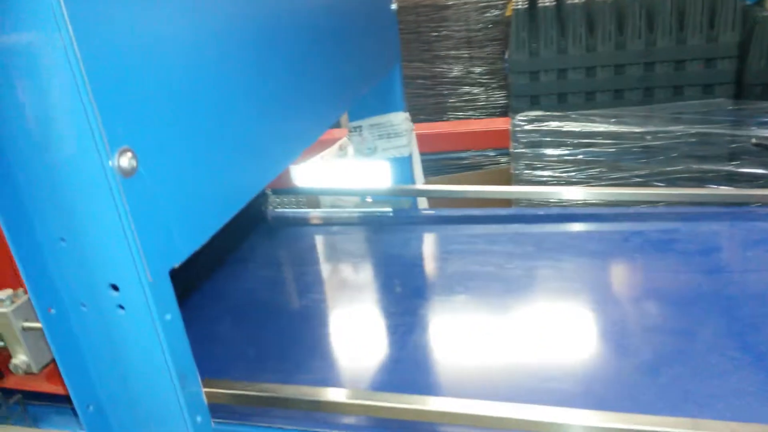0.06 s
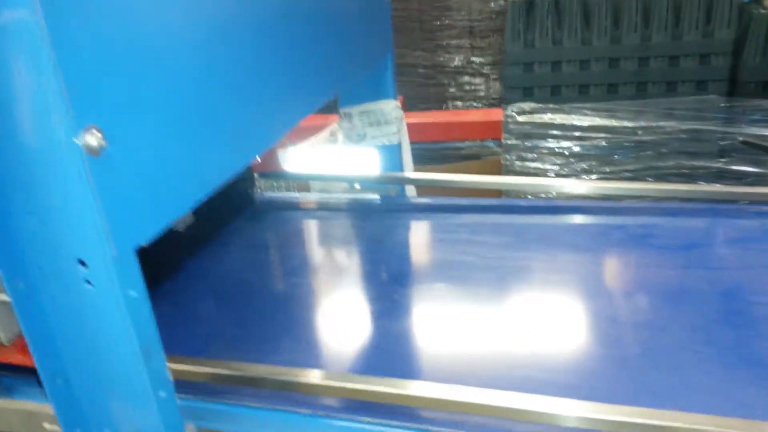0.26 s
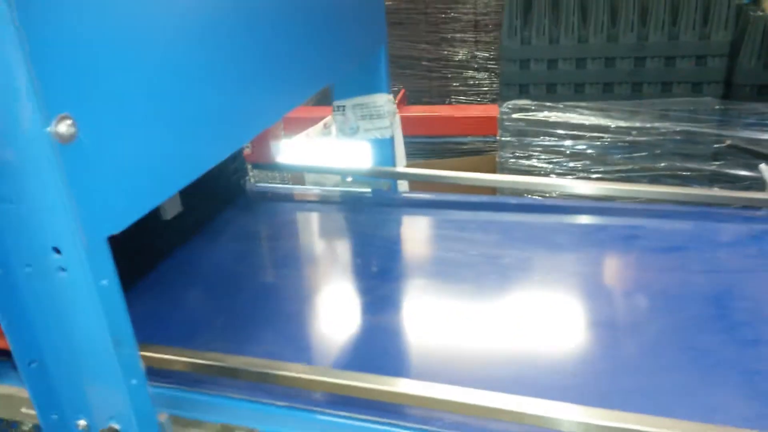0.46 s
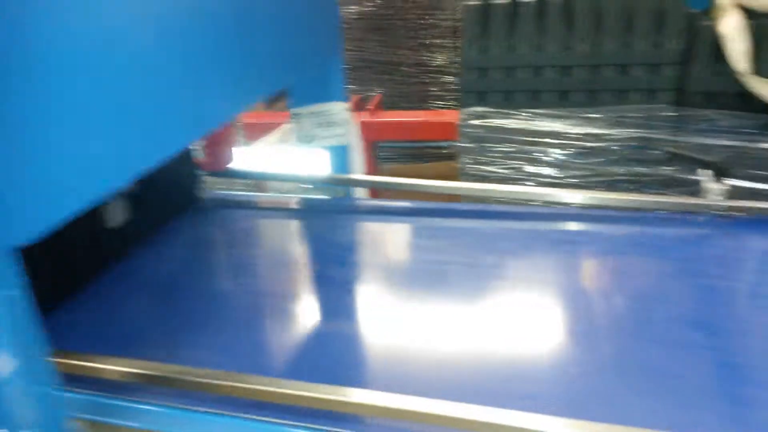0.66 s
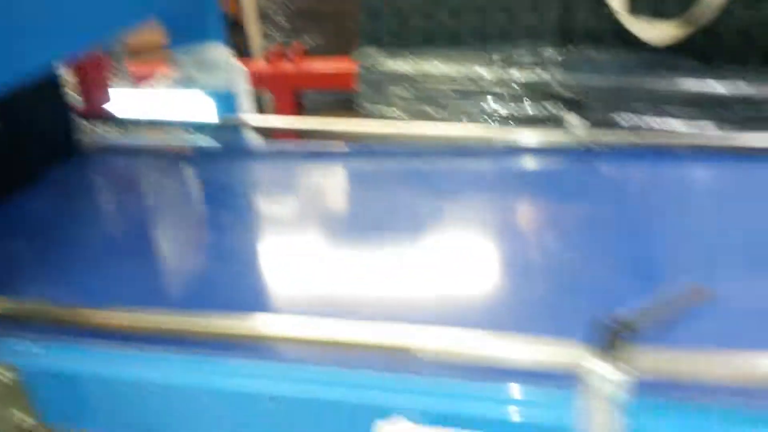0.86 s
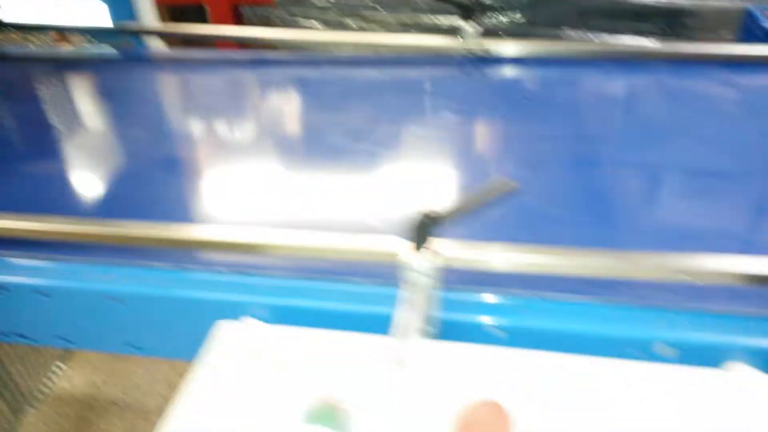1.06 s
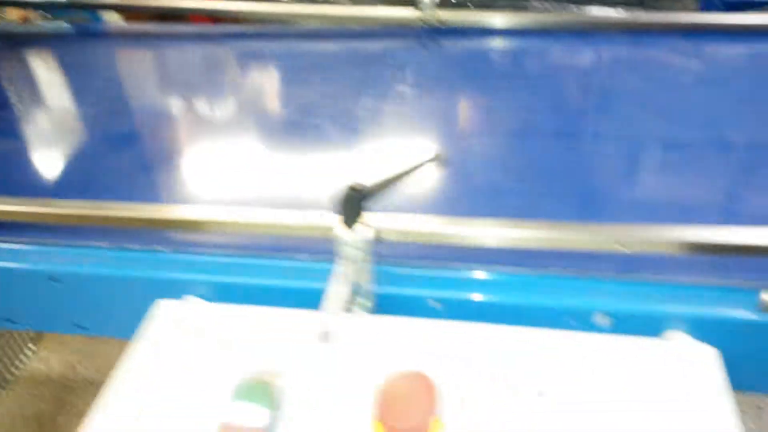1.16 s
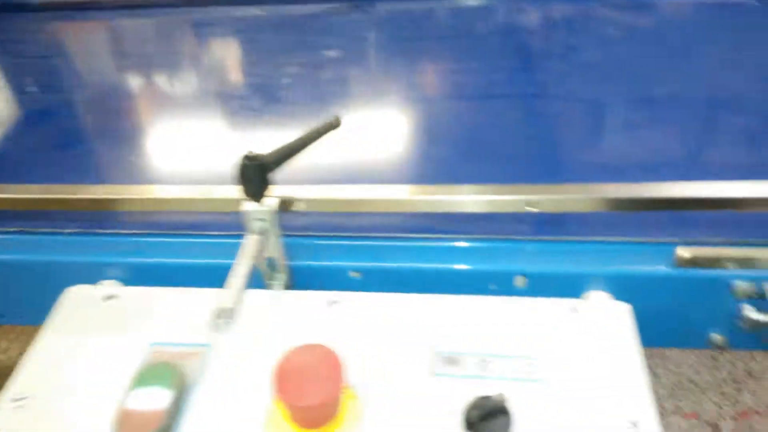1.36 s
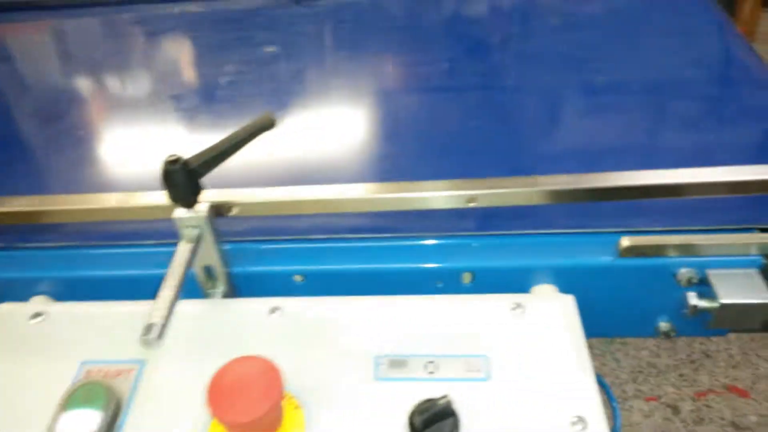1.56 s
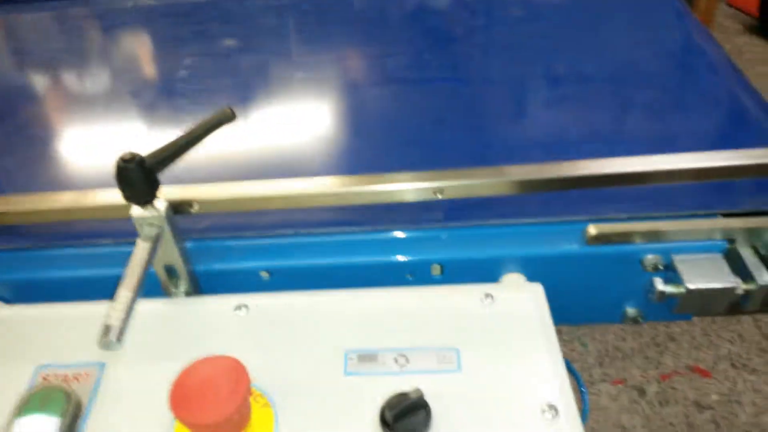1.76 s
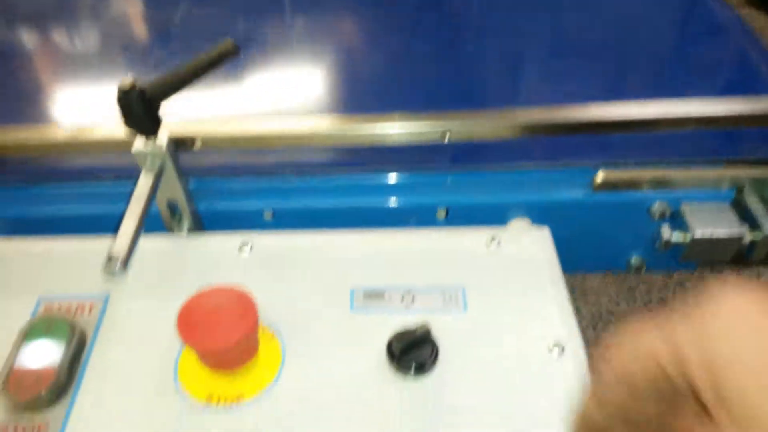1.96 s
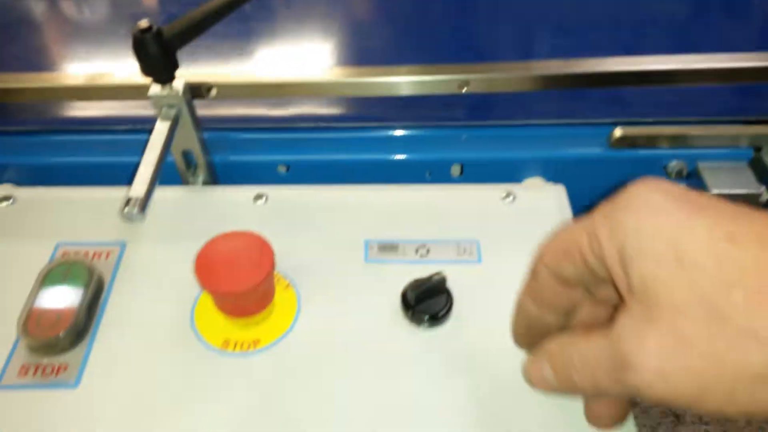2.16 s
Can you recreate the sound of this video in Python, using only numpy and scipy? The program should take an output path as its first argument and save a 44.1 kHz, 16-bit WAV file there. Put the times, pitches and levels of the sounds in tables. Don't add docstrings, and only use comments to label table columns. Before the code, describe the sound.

Brittle plastic and metal clacks, a hard slam, then small dry ticks in a bright hall

```python
import sys
import numpy as np
from scipy import signal
from scipy.fft import rfft, irfft
from scipy.io import wavfile

SR = 44100
rng = np.random.default_rng(int(sys.argv[2]) if len(sys.argv) > 2 else 0)


def transcribe(signal):
    frames = np.atleast_2d(signal).T
    limited = np.clip(frames, -1, 1)
    pcm = np.round(limited * 32767).astype(np.int16)
    wavfile.write(sys.argv[1], SR, pcm)


def convert_level_to_amplitude(level_db):
    exponent = np.asarray(level_db, float) / 20
    return 10 ** exponent


N = 97020

# (mode [Hz], level [dB], t60 [s])
TRAY_MODES = [(624, -5, 0.041), (825, -0.5, 0.018), (1154, -2, 0.0091), (1412, -9.5, 0.072),
              (1602, -1.5, 0.0089), (2000, -2, 0.013), (2400, -1, 0.018), (2820, 6, 0.0086),
              (3420, 5.5, 0.014)]
DEEP_TRAY_MODES = [(872, -7, 0.027), (1000, -6, 0.049), (1123, 0, 0.031), (1747, 1.5, 0.025),
                   (2000, 3.5, 0.029)]
# (mode [Hz], lift [dB])
RAIL_MODES = [(2680, 14.5), (3900, 10), (4650, 0), (5700, 4), (6940, 0), (8100, -2), (11000, -0.5)]


def band(x, hz, q):
    return signal.lfilter(*signal.iirpeak(min(hz, 20000), q, fs=SR), x)


def ring(x, hz, t60):
    pole = np.exp(2j * np.pi * hz / SR - np.log(1000) / (t60 * SR))
    return signal.lfilter([1], [1, -pole], x).imag


def unit(x):
    return x / np.sqrt(np.mean(x ** 2))


def spread(mid, side, width):
    return np.array([mid + width * side, mid - width * side])


def pan(db):
    return convert_level_to_amplitude(np.array([[.5], [-.5]]) * db)


def curve(points, hz):
    points = np.array(points)
    return np.interp(np.log(hz), np.log(points[:, 0]), points[:, 1])


def add(out, s, x):
    i = max(int(s * SR), 0)
    out[:, i:i + x.shape[1]] += x[:, :N - i]


def floor():
    # (frequency [Hz], level [dB])
    air_bands = [(30, -25), (60, -12), (110, 0), (300, -19), (700, -12), (1500, -28.5), (6000, -25),
                 (14000, -23.5)]
    # (frequency [Hz], level [dB])
    hum = [(100, -65), (200, -68), (300, -71.5)]
    air_db = -61.5
    out, t = 0, np.arange(N) / SR
    for hz in 30 * 2 ** np.arange(0, 9, .5):
        a, b = rng.standard_normal((2, N))
        width = min(0.46 + hz / 8100.0, 1)
        noise = band(band(spread(a, b, width), hz, 0.56), hz, 0.89)
        out = out + convert_level_to_amplitude(curve(air_bands, hz)) * noise
    out = unit(out) * convert_level_to_amplitude(air_db)
    for hz, db in hum:
        waver = unit(band(rng.standard_normal(N), hz, hz / 6.7))
        out = out + convert_level_to_amplitude(db) * (np.sin(2 * np.pi * hz * t) + 0.57 * waver)
    return out


def hall(x):
    # (frequency [Hz], t60 [s])
    fade = [(150, 0.93), (1000, 0.32), (4000, 0.42), (7000, 0.35), (9000, 0.46), (13000, 0.24)]
    # (delay [s], level [dB])
    echoes = [
        (.0045, -18),
        (.008, -19),
        (0.0126, -25),
    ]
    tail_db, onset_s = -10, 0.0021
    t = np.arange(SR) / SR
    ir = np.zeros((2, SR))
    for hz in 125 * 2 ** np.arange(0, 7, .5):
        a, b = rng.standard_normal((2, SR))
        width = min(hz / 880.0, 1)
        noise = band(spread(a, b, width), hz, 2.96)
        ir += noise * convert_level_to_amplitude(-60 * t / curve(fade, hz)) / np.sqrt(1 + width * width)
    ir *= np.minimum(t / onset_s, 1)
    ir *= convert_level_to_amplitude(tail_db) / np.sqrt(np.sum(ir ** 2) / 2)
    for s, db in echoes:
        ir[[0, 1], [int(s * SR), int(s * SR * 1.06)]] += convert_level_to_amplitude(db)
    return signal.fftconvolve(x, ir, axes=1)[:, :N]


def thuds(out):
    # (time [s], level [dB], pitch [Hz], t60 [s])
    bumps = [(0, -45, 320, 0.11), (0.086, -44, 197, 0.41), (0.123, -41.5, 174, 0.092),
             (0.199, -42.5, 337, 0.57), (.27, -43.5, 135, 0.85), (.43, -33.5, 1000, 0.31),
             (0.412, -32.5, 400, 0.047), (0.441, -37, 202, 0.2), (0.746, -42.5, 486, 0.26),
             (0.766, -39.5, 396, 0.13), (0.781, -41.5, 138, 0.24), (0.799, -42, 440, 0.15),
             (0.876, -39.5, 415, 0.21), (0.929, -53.5, 423, 0.83), (1.025, -32, 384, 0.035),
             (1.033, -31.5, 630, 0.032), (1.415, -33, 700, 0.021), (1.081, -51.5, 227, 0.31)]
    rise_s = 0.0047
    t = np.arange(SR // 3) / SR
    for s, db, hz, t60 in bumps:
        a, b = (unit(band(band(rng.standard_normal(len(t)), hz, 2.7), hz, 0.3)) for _ in range(2))
        env = convert_level_to_amplitude(db - 60 * t / t60) * np.minimum(t / rise_s, 1)
        add(out, s, env * np.array([a + 0.12 * b, a - 0.076 * b]))


def grit(x):
    # (frequency [Hz], gain [dB])
    colour = [(500, -18.5), (2000, -6), (3500, -4), (5000, -3), (7000, -3), (8500, -10.5), (11000, -17.5),
              (15000, -22)]
    log_gain = curve(colour, np.linspace(1, SR / 2, 513)) * np.log(10) / 20
    c = irfft(log_gain)
    c[1:512], c[513:] = 2 * c[1:512], 0
    return signal.lfilter(irfft(np.exp(rfft(c)))[:256], [1], x)


def rail(x, modes=RAIL_MODES, q=17.0):
    return x + sum(convert_level_to_amplitude(db) * band(x, hz, q) for hz, db in modes)


def tray(push, hz, modes=TRAY_MODES):
    focus_db_per_oct2 = 12.5
    out = 0
    for k, (f, db, t60) in enumerate(modes):
        gain = convert_level_to_amplitude(db - focus_db_per_oct2 * np.log2(f / hz) ** 2)
        out = out + (-1) ** k * gain * ring(push, f, t60)
    return out


def clicks(rate):
    spread_db = 1.5
    sizes = convert_level_to_amplitude(spread_db * rng.exponential(size=N))
    return (rng.random(N) < rate / SR) * sizes * rng.choice([-1, 1], N)


def crunches():
    # (start [s], level [dB], rise [s], t60 [s], tray [dB])
    swarms = [(0, -41, 0.0006, 0.31, -14), (0.086, -48, 0.018, 0.15, -32), (0.199, -18, 0.038, 0.18, -24),
              (0.274, -35, 0.0049, 0.27, -4), (0.407, -21.5, 0.0056, 0.095, -2.5),
              (0.427, -49, 0.0018, 0.1, 16), (0.508, -36, 0.0033, 0.38, -31),
              (0.699, -51.5, 0.016, 0.34, -20), (0.751, -43.5, 0.053, 0.15, 3.5),
              (0.873, -34.5, 0.0057, 0.13, 3.5), (0.981, -48.5, 0.0076, 1, -2.5),
              (1.038, -28, 0.0012, 0.17, -42), (1.054, -28.5, 0.0084, 0.4, -29),
              (1.17, -51.5, 0.075, 0.31, 4), (1.418, -29, 0.0013, 0.081, -8.5),
              (1.445, -24, 0.0037, 0.33, -17), (1.612, -41.5, 0.026, 0.57, -22)]
    # (mode [Hz], lift [dB])
    slide_modes = [(945, 17.5), (1450, 18.5), (2640, 7), (3300, -25), (4900, -10), (7300, -1)]
    tray_swaps = .6, 1.17, 1.4
    slide_from_s, rail_from_s, rail_to_s = 1.0, 1.4, 1.63
    rate, unlike, air_db, pan_db = 2100, 0.78, 2.5, -2

    t = np.arange(N) / SR
    env, tray_env = np.zeros(N), np.zeros(N)
    for s, db, rise, t60, tray_db in swarms:
        u = np.maximum(t - s, 0)
        e = convert_level_to_amplitude(db) * np.minimum(u / rise, 1) * convert_level_to_amplitude(-60 * np.maximum(u - rise, 0) / t60)
        env = env + e
        tray_env = tray_env + e * convert_level_to_amplitude(tray_db)

    out = grit(spread(clicks(rate * 2), clicks(rate * 2), unlike))
    out = out + convert_level_to_amplitude(air_db) * band(out, 10000, 0.71)
    sliding = unit(band(rail(out, slide_modes, 25.0), 8800, 0.65))
    out = np.where((t > slide_from_s) & (t < rail_from_s), sliding, unit(out))
    railing = unit(band(rail(out), 6400, 0.75))
    out = np.where((t > rail_from_s) & (t < rail_to_s), railing, unit(out))

    places = [(1070.0, DEEP_TRAY_MODES), (1650.0, TRAY_MODES), (1010.0, TRAY_MODES), (1590.0, TRAY_MODES)]
    bodies = [unit(tray(clicks(rate), hz, modes)) for hz, modes in places]
    body = np.choose(np.digitize(t, tray_swaps), bodies)
    return (out * env + body * tray_env) * pan(pan_db)


def snaps(out, table, bounce_db, tray_hz, low_hz, top_hz, leak_db, pitch_db,
          modes=(), rough=0.27, hollow=TRAY_MODES):
    contact_s, grit_t60_s, bounce_s = 0.0001, 0.0096, 0.0009
    snap_gain_db, tray_gain_db = 8, 6.5
    t = np.arange(4096) / SR
    strike = (t == t[8]) * 1.
    wake = rough * np.minimum(t / contact_s, 1) * convert_level_to_amplitude(-60 * t / grit_t60_s)
    body = tray(strike, tray_hz, hollow)
    body = body / np.abs(body).max()
    edges = signal.butter(3, [low_hz, top_hz], "band", fs=SR, output="sos")
    for s, db, hz, tray_db, pan_db in table:
        x = grit(strike + rng.standard_normal((2, len(t))) * wake)
        x = x + convert_level_to_amplitude(pitch_db) * band(x, hz, 3.4)
        x = signal.sosfilt(edges, rail(x, modes, 15.0)) + convert_level_to_amplitude(leak_db) * x
        cycles = round(hz * bounce_s) + np.array([1, 0])
        for ch, lag in enumerate(np.round(cycles / hz * SR).astype(int)):
            first = convert_level_to_amplitude(bounce_db) * np.roll(x[ch], lag)
            second = convert_level_to_amplitude(2.16 * bounce_db) * np.roll(x[ch], 2 * lag)
            x[ch] = x[ch] + first + second
        x = x / np.abs(x).max() * convert_level_to_amplitude(snap_gain_db) + convert_level_to_amplitude(tray_db + tray_gain_db) * body
        add(out, s, x * convert_level_to_amplitude(db) * pan(pan_db))


def scene():
    # (time [s], peak [dB], pitch [Hz], tray [dB], pan [dB])
    cracks = [(0.1205, -45.5, 3800, -8, 5), (0.1911, -18, 4860, -20.5, 8),
              (0.2015, -6.5, 5210, -26.5, -0.5), (0.2097, -10, 6500, -48, 5), (0.2487, -10, 7160, -20.5, 7),
              (0.255, -16.5, 6130, -19, 7), (0.2608, -18.5, 5500, -23, -6),
              (0.2149, -15, 3870, -15.5, -1.5), (0.2269, -17, 6800, -14, 7), (0.2388, -30, 6700, -20, 16),
              (0.2424, -9, 7380, -22, 6), (0.2782, -14.5, 6860, -12, 4.5), (0.291, -21, 6760, -12, 0),
              (0.3059, -19.5, 6400, -4.5, -2), (0.3806, -28.5, 6600, -32, 4), (0.4091, -7, 6690, -16, 4),
              (0.4275, -17, 4720, -11.5, -7.5), (0.5107, -19, 5000, -24.5, 1),
              (0.5218, -33.5, 5600, -23, -24)]
    knocks = [(0.687, -42.5, 4625, -30, -6), (0.7077, -44, 5370, -23, 3), (0.713, -42, 5900, -18, 6),
              (0.7449, -38, 2400, -8.5, 1), (0.7586, -40, 6000, -20, 0), (0.837, -46, 6100, -17, 3),
              (1.75, -50, 2000, -4, 7), (1.7567, -49.5, 2000, -4, 8), (0.7824, -26, 7000, -12, 3),
              (0.858, -39.5, 5750, -9, 7), (0.8686, -31.5, 6000, -6.5, 5), (0.8732, -17.5, 3500, -48, -4.5),
              (0.9796, -34, 4660, -13, -15), (1.2896, -38, 5200, -8, -7.5)]
    slams = [
        (1.023, -14.5, 5930, -14.5, -3.5),
        (1.0319, -24.5, 5870, -9, 14),
        (1.037, -4.5, 7500, -36, 6.5),
        (1.045, -24.5, 6300, -22, -24),
        (1.047, -32, 6500, -30, 5),
        (1.06, -20, 6590, -32, 7),
        (1.0674, -15, 6200, -30, 7),
        (1.0706, -17.5, 6900, -32, 1),
    ]
    clacks = [
        (1.4144, -9.5, 4590, -15.5, 0.77),
        (1.4222, -11, 5760, -20.5, -5),
        (1.4288, -26, 4600, -16, -4),
        (1.453, -33, 5800, -39, -9),
        (1.4687, -27, 7050, -34, 1),
        (1.446, -11.5, 6890, -38, 0.85),
        (1.448, -9, 7100, -46, 1),
        (1.4942, -17.5, 4530, -13.5, 1),
        (1.608, -24.5, 5750, -11, 0.2),
    ]
    ticks = [
        (1.6433, -15, 7210, -29.5, -1.5),
        (1.735, -20.5, 6120, -39, -4),
        (1.7614, -17.5, 5940, -36, -3),
        (1.822, -29.5, 5980, -24.5, -3),
        (1.9102, -11.5, 7590, -41, -4),
        (1.9705, -18, 6250, -38, -3.5),
        (2.0037, -30, 6100, -32, -13),
        (2.025, -32, 6650, -35, 18),
        (2.0356, -31.5, 5900, -30, -9),
    ]
    # (mode [Hz], lift [dB])
    slam_modes = [(4400, -5), (5100, 2), (6000, 2), (7500, 3), (11500, 10)]
    clip_modes = [(2800, 10), (4300, 9), (5000, 5.5), (6150, 5.5), (7350, 2.5), (8500, -4.5), (9600, -12)]
    # (frequency [Hz], share removed, sharpness [Q])
    shadows = [(2690, 0.61, 0.49), (5520, 0.96, 5.4)]
    port_lag_s = 0.00016

    dry = crunches()
    snaps(dry, cracks, bounce_db=-4.5, tray_hz=1180, low_hz=1500, top_hz=14200, leak_db=-46, pitch_db=2.5,
          hollow=DEEP_TRAY_MODES)
    snaps(dry, knocks, bounce_db=-47, tray_hz=1500, low_hz=1660, top_hz=14800, leak_db=30, pitch_db=12)
    snaps(dry, slams, bounce_db=-11, tray_hz=1620, low_hz=2230, top_hz=15000, leak_db=-19, pitch_db=0.5,
          modes=slam_modes, rough=0.14)
    snaps(dry, clacks, bounce_db=-4.5, tray_hz=1750, low_hz=1650, top_hz=8900, leak_db=-22, pitch_db=9.5,
          modes=RAIL_MODES, rough=0.18)
    snaps(dry, ticks, bounce_db=-7.5, tray_hz=1400, low_hz=3650, top_hz=12750, leak_db=-46, pitch_db=10.5,
          modes=clip_modes, rough=0.068)
    thuds(dry)
    wet = hall(dry)
    for hz, share, q in shadows:
        dry[0] = dry[0] - share * band(dry[0], hz, q)
    dry[1] = np.roll(dry[1], int(port_lag_s * SR))
    return dry + wet + floor()


def low_pass(x):
    return signal.sosfilt(signal.butter(12, 15690, fs=SR, output="sos"), x)


def record(dry):
    limit, top_hz = 0.9, 14600
    x = dry / (1 + (dry / limit) ** 4) ** .25
    x = signal.sosfilt(signal.cheby1(8, .5, top_hz, fs=SR, output="sos"), x)
    mix = limit * x
    return low_pass(mix)


dry = scene()
out = record(dry)
transcribe(out)
```